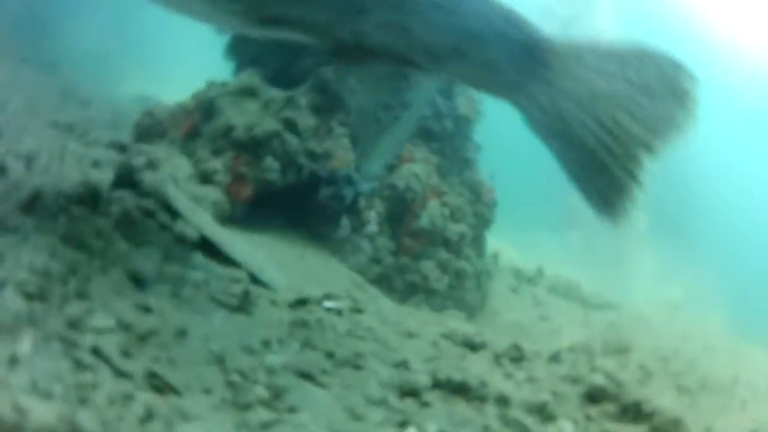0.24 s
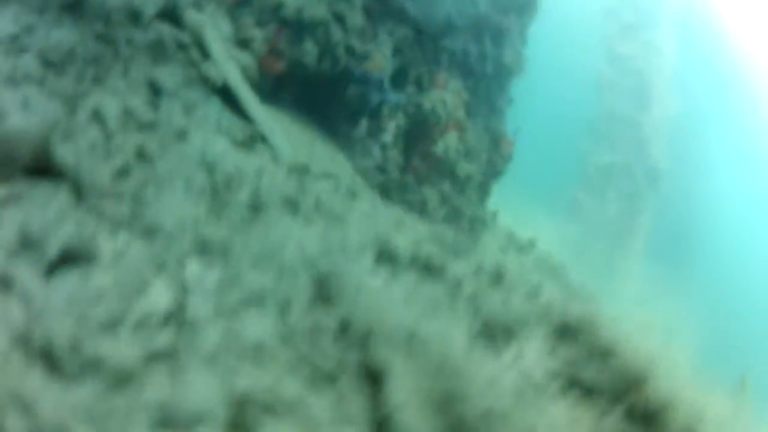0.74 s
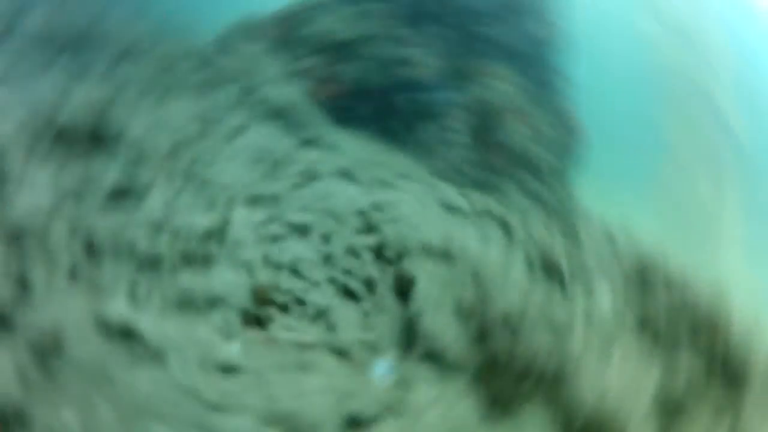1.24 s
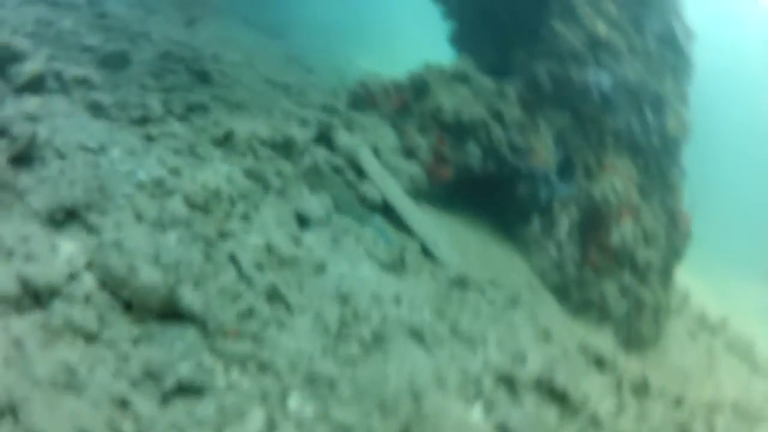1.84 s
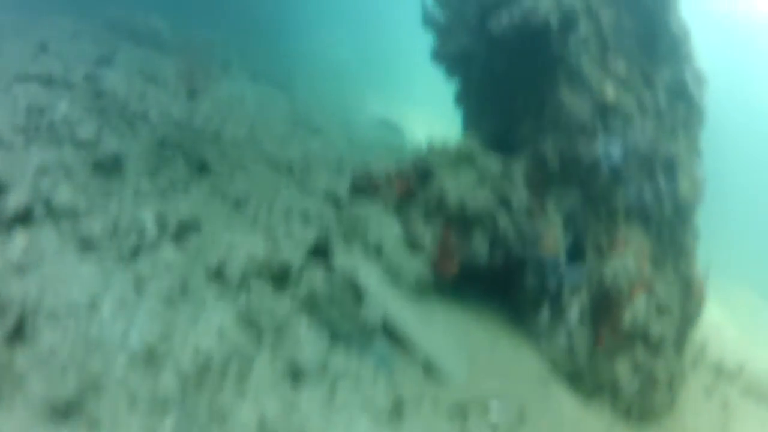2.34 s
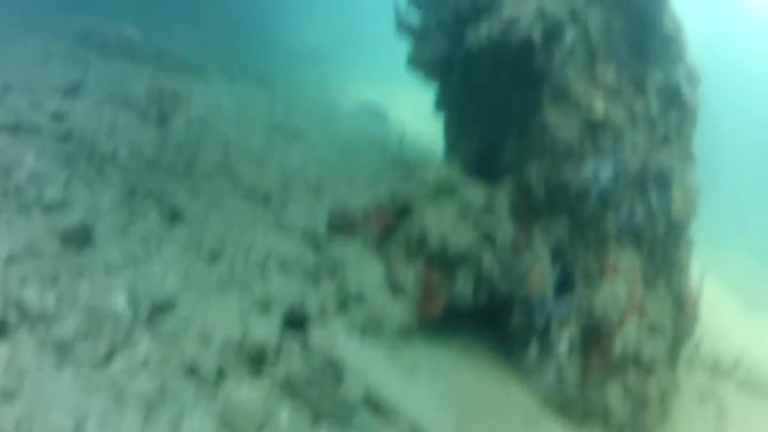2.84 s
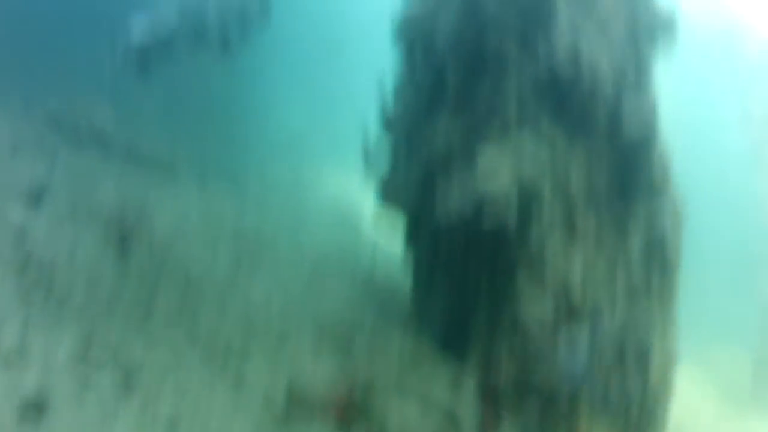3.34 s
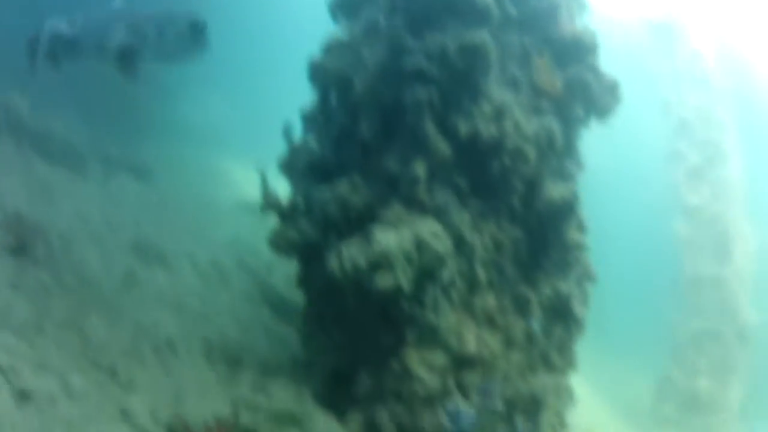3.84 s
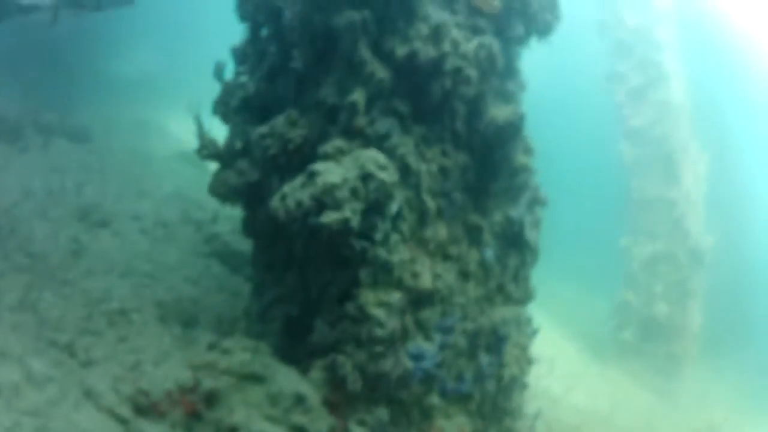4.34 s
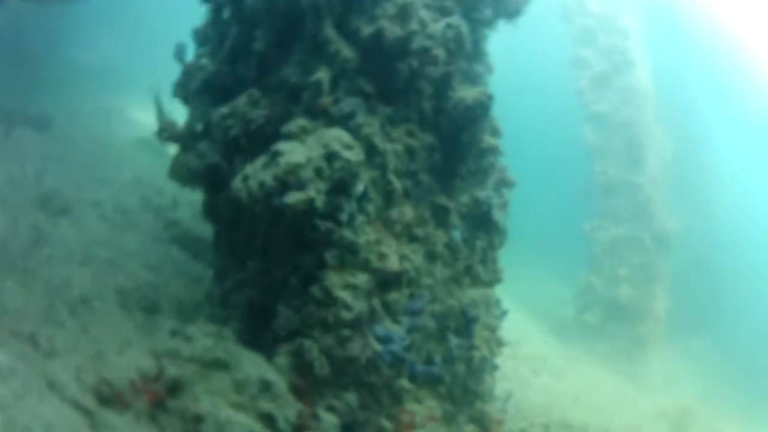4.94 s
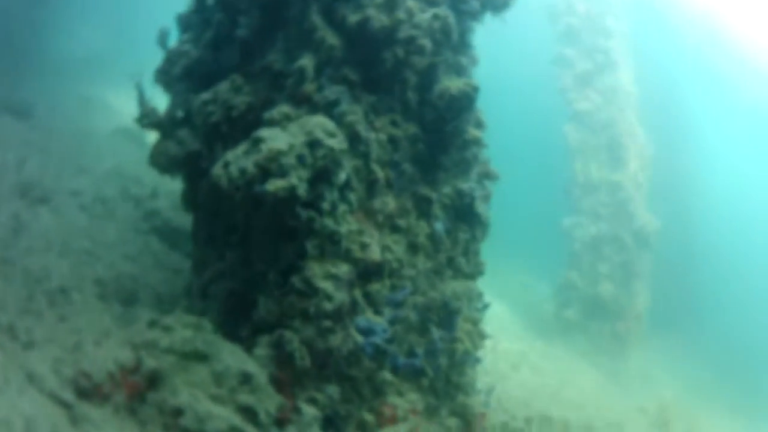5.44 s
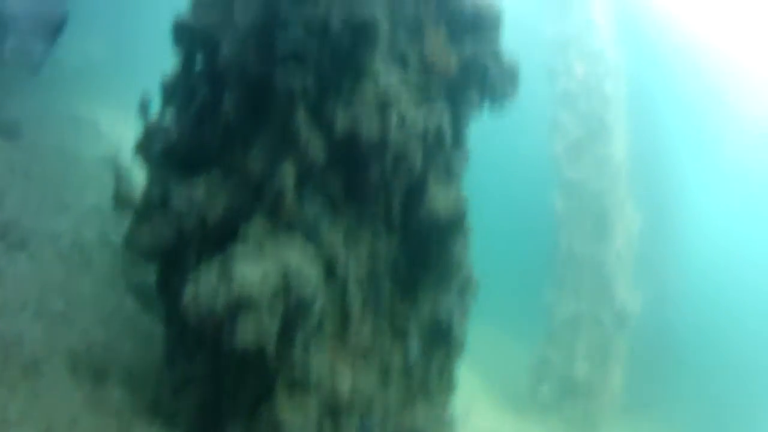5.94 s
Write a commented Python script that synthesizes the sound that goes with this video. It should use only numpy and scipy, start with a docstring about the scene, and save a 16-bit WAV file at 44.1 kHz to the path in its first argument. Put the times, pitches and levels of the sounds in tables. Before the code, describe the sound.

Harbor water near pilings, heard boxed-in and gritty by a microphone sealed in a housing. Distant shrimp make a constant frying fizz of tiny clicks, with individual snaps closer by. Early on, a short cluster of violent bumps on the case thuds, rasps and squeaks, clipping harshly. Afterward only crackle and faint low wash remain, ending with several brighter, louder pops.

```python
"""Snapping shrimp crackle near and far under a harbour pier, heard inside a sealed camera housing.
Each snap is a spike with a scattered tail, coloured by the resonant wall; the far bed adds a noise fizz.
A faint rumble and drone lie below. Around one second bumps rasp the wall, thud the sealed air and make the
mount squeak by stick-slip. Loud knocks duck the gain and overload the recorder, which samples slowly and
holds each value, mirroring the sound into a gritty treble."""
import sys
import numpy as np
from scipy import signal
from scipy.fft import rfft, irfft
from scipy.io import wavfile
from scipy.ndimage import uniform_filter1d, minimum_filter1d

SR = 44100
rng = np.random.default_rng(int(sys.argv[2]) if len(sys.argv) > 2 else 0)


def to_wav(sig):
    """Store sig (one row per channel, or 1-D mono) as 16-bit WAV at the path in sys.argv[1].

    Samples outside -1..1 are clipped; the rate is SR.
    """
    pcm = np.clip(np.atleast_2d(sig), -1, 1) * 32767
    pcm = np.round(pcm).astype(np.int16)
    wavfile.write(sys.argv[1], SR, pcm.T)  # frames by channels


N = 273420  # samples in the scene

SPAN = 8192  # samples in one impulse response or event
AGE = np.arange(SPAN) / SR  # seconds since the event began
HZ = np.fft.rfftfreq(SPAN, 1 / SR)


def from_db(db):
    """Logarithmic level: 20 dB is a factor of ten in amplitude."""
    return 10 ** (np.asarray(db) / 20)


def rms_one(x):
    """Mean power: scale to rms 1."""
    return x / np.sqrt(np.mean(x ** 2) + 1e-20)


def burst_one(x, size=220):
    """Short-time power: scale so that the loudest 5 ms have rms 1."""
    power = uniform_filter1d(x ** 2, size, mode="constant")
    return x / np.sqrt(power.max() + 1e-20)


def colour(points):
    """Spectral envelope: gain interpolated over log frequency from (hz, gain_db) points."""
    hz, db = np.transpose(points)
    return from_db(np.interp(np.log(HZ + 1), np.log(hz), db))


def bell(hz, width):
    """Resonance: a steep-sided curve with top 1, about a third as high one width from the centre."""
    return (1 + ((HZ - hz) / width) ** 2) ** -1.5


def resonances(modes):
    """Modal superposition: the powers of (hz, width_hz, gain_db) resonances add."""
    power = sum((from_db(db) * bell(hz, width)) ** 2 for hz, width, db in modes)
    return np.sqrt(power)


def response(gain):
    """Minimum phase: folding the cepstrum gives a causal impulse response with this gain."""
    cepstrum = irfft(np.log(gain + 1e-6))
    cepstrum[1:SPAN // 2] *= 2
    cepstrum[SPAN // 2 + 1:] = 0
    return irfft(np.exp(rfft(cepstrum)))


def through(x, impulse):
    """Linear filtering: convolve with an impulse response, keeping the length."""
    return signal.fftconvolve(x, impulse)[:len(x)]


def add(out, s, sound):
    """Superposition: mix a sound in at a time in seconds."""
    at = max(round(s * SR), 0)
    out[at:at + len(sound)] += sound[:max(len(out) - at, 0)]


# resonances of the housing wall: (pitch_hz [Hz], width_hz [Hz], relative gain_db [dB])
WALL_MODES = [(557, 390, -24), (701, 70, -16.5), (885, 52, -11.5), (980.4, 64, -12), (1520, 280, -6.5),
              (2089, 370, 0.5), (2377, 240, 0.5), (3005, 230, -9.5), (3560, 470, -5.5), (4330, 630, -17),
              (5062, 590, -15), (5470, 540, -17.5)]
# dips in the passed sound: (pitch_hz [Hz], width_hz [Hz], gain_db [dB]); gaps the wall hardly passes, and a #
# separate shallow dip at 6 kHz
WALL_GAPS = [(1232, 180, -11.5), (2605, 73, -15), (6000, 300, -1)]


def wall():
    """Modal transmission: the wall passes sound best at its resonances and poorly in its gaps."""
    gaps_db = sum(db * bell(hz, width) for hz, width, db in WALL_GAPS)
    return resonances(WALL_MODES) * from_db(gaps_db)


def snap(gain, tilt_db, boosted_hz, extra_tail_db, boost_db=6.5, boost_width_hz=350,
         scatter_db=-19, scatter_t60=0.028, tail_db=-35, tail_t60=0.15):
    """Cavitation: a collapsing bubble spikes, scatters off piling and seabed, and leaves a faint tail."""
    scatter = from_db(scatter_db - 60 * AGE / scatter_t60)
    tail = from_db(tail_db + extra_tail_db - 60 * AGE / tail_t60)
    arrivals = (scatter + tail) * rng.standard_normal(SPAN)
    arrivals[0] += rng.choice([-1, 1])  # the direct spike
    tilt = tilt_db * np.log2(np.clip(HZ, 600, 6000) / 2200)  # small claws snap brighter
    boost = boost_db * bell(boosted_hz, boost_width_hz)  # each snap has its own colour
    return burst_one(through(arrivals, response(gain * from_db(tilt + boost))))


# course of the far shrimp bed, before its trim and mix: (time_s [s], level_db [dB])
BED_COURSE = [(0.0, -52.5), (0.38, -54), (0.78, -53.5), (0.92, -54.5), (1.0, -51), (1.66, -54.5),
              (2.55, -54.5), (2.69, -56.5), (3.38, -54.5), (4.52, -54), (4.8, -56.5), (5.33, -53.5),
              (5.51, -55), (5.8, -52), (6.2, -51.5)]
BED_TRIM_DB = -0.5


def far_shrimp(per_s=150, spread_db=5.0, variety_db=4.5, extra_tail_db=2.5, fizz_db=-3.5, count=24):
    """Random arrivals: many colonies snap, each with its own colour; the furthest merge into a fizz."""
    gain, crackle = wall(), np.zeros(N)
    tilts = variety_db * np.linspace(-1.5, 1.5, count)  # dB per octave
    boosted = rng.permutation(np.linspace(800, 5400, count))  # Hz
    for tilt_db, boosted_hz in zip(tilts, boosted):
        sizes = from_db(spread_db * np.minimum(rng.exponential(1, N), 2.5))
        snaps = sizes * (rng.random(N) < per_s / count / SR)
        crackle += through(snaps, snap(gain, tilt_db, boosted_hz, extra_tail_db))
    fizz = through(rng.standard_normal(N), response(gain))
    s, db = np.transpose(BED_COURSE)
    level = from_db(BED_TRIM_DB + np.interp(np.arange(N) / SR, s, db))
    return level * (rms_one(crackle) + from_db(fizz_db) * rms_one(fizz))


# spectrum of the low wash of the water: (pitch_hz [Hz], relative gain_db [dB])
WASH_SPECTRUM = [(12, -22.5), (25, -3.5), (100, 0.5), (250, -2.5), (480, -8.5), (750, -14.5), (1000, -8.5),
                 (1300, -19), (3000, -23.5)]
# narrow tones that drone in the housing: (pitch_hz [Hz], width_hz [Hz], relative gain_db [dB])
DRONE_MODES = [(735, 22, -3.5), (975, 18, 0.5)]
WASH_DB, DRONE_DB = -61, -75.5  # rms level of each


def wash():
    """Filtered noise: a faint steady harbour rumble, with narrow resonances droning thinly above it."""
    rumble = rms_one(through(rng.standard_normal(N), response(colour(WASH_SPECTRUM))))
    drone = rms_one(through(rng.standard_normal(N), response(resonances(DRONE_MODES))))
    return from_db(WASH_DB) * rumble + from_db(DRONE_DB) * drone


# nearest snaps: (start_s [s], level_db of the loudest 5 ms [dB], tilt_db [dB per octave],
# pitch_hz around which the snap's colour is boosted [Hz])
NEAREST_SNAPS = [(0.012, -38, -3, 2470), (0.066, -29, 2, 1400), (0.087, -34.5, 1, 5510),
                 (0.127, -38.5, -1.5, 3770), (0.1955, -30.5, -3.5, 2270), (0.6042, -44.5, -5, 3780),
                 (0.695, -42, -5, 4500), (1.3555, -39.5, 1, 5400), (1.5265, -36.5, 0, 2370),
                 (1.5707, -34, 2.5, 1700), (1.6137, -39, -4.5, 3000), (1.6731, -40, -3, 950),
                 (1.7496, -38.5, -2, 3300), (1.8522, -42.5, 4.5, 1797), (1.9314, -34.5, 5, 3470),
                 (1.971, -29, -2, 3020), (2.0525, -39, 1, 3550), (2.2477, -35.5, 3, 2230),
                 (2.408, -36, 9, 800), (2.4233, -39.5, 0, 1695), (2.4664, -40.5, 1.5, 2013),
                 (2.604, -33, 7, 802), (2.6175, -39.5, 0, 4060), (2.6455, -39.5, -3, 4920),
                 (2.8586, -35, 3.5, 797), (2.8956, -39.5, -4.5, 5140), (2.9993, -38.5, 9.5, 950),
                 (3.2703, -38.5, -1.5, 2560), (3.329, -43, -0.5, 804), (3.3426, -41, 6, 1910),
                 (3.454, -33.5, 0.5, 1830), (3.4831, -31.5, 4.5, 3600), (3.652, -42.5, 7, 1620),
                 (3.7818, -42.5, 1, 4960), (3.992, -38.5, 2.5, 3130), (4.0097, -38, 9.5, 800),
                 (4.0706, -39.5, -1.5, 1910), (4.5726, -38.5, -0.5, 4840), (4.6089, -37.5, -0.5, 5170),
                 (4.6385, -36, 0, 4700), (4.9831, -28.5, 2, 1836), (5.0634, -40, -1, 1690),
                 (5.334, -33.5, 0.5, 4200), (5.424, -39, 4, 5170), (5.539, -33, 1, 1900),
                 (5.6157, -19.5, 4.5, 2500), (5.9097, -25, 3, 2120), (5.993, -38, -1.5, 2500),
                 (6.05, -36.5, 2.5, 2510), (6.1189, -24.5, 0.5, 3520), (6.182, -36, 7, 950)]
# shrimp at middle distance snap at random: rate, level and its spread, spread of tilt per octave
MIDDLE_PER_S, MIDDLE_DB, MIDDLE_SPREAD_DB, MIDDLE_TILT_DB = 5, -47, 1.5, 2.5
BOOSTED_LOW_HZ, BOOSTED_HIGH_HZ = 1308, 4940  # where the colour of a random snap may be boosted
# chosen rule: fainter and duller snaps are given a stronger tail:
# level with the usual tail, dB of tail per dB of level, dB of tail per dB/octave of tilt
USUAL_SNAP_DB, TAIL_PER_DB, TAIL_PER_TILT = -33, 0.62, 1.5


def near_shrimp():
    """Direct-to-reverberant ratio: single snaps stand out; fainter, duller ones get a stronger tail."""
    out, gain = np.zeros(N), wall()
    middle = []
    for s in np.flatnonzero(rng.random(N) < MIDDLE_PER_S / SR) / SR:
        db = MIDDLE_DB + MIDDLE_SPREAD_DB * rng.normal()
        tilt_db = MIDDLE_TILT_DB * rng.normal()
        boosted_hz = BOOSTED_LOW_HZ * (BOOSTED_HIGH_HZ / BOOSTED_LOW_HZ) ** rng.random()
        middle.append((s, db, tilt_db, boosted_hz))
    for s, db, tilt_db, boosted_hz in NEAREST_SNAPS + middle:
        extra_tail_db = TAIL_PER_DB * (USUAL_SNAP_DB - db) - TAIL_PER_TILT * tilt_db
        add(out, s, from_db(db) * snap(gain, tilt_db, boosted_hz, extra_tail_db))
    return out


# knocks on the housing, from faint ticks to hard bumps: (start_s [s], contact length_s [s],
# shell rasp level_db [dB], mount squeak level_db [dB], slip rate [per s], thud level_db [dB], thud delay_s [s])
HOUSING_KNOCKS = [(0.748, .001, -38.5, -41.5, 1300, -39, .0002),
                  (0.7806, 0.000505, -13.5, -26.5, 690, -31, 0.0072),
                  (0.787, 0.0032, -16, -18.5, 1740, -38.5, .001),
                  (0.8066, 0.0053, -1.5, -0.5, 1460, 10.5, 0.0033),
                  (0.9492, .0055, -15, -10.5, 1550, 0, .0037), (0.9871, .0035, -4.5, 1, 1010, -10, .0003),
                  (1.1050, .0036, -9, 1.5, 990, -8.5, 0.00026),
                  (1.1998, 0.0033, -7.5, -1, 2100, -11.5, 0.002),
                  (1.2245, 0.0018, -26.5, -25.5, 1200, -18, 0.0015)]
GRAZE_LEAD, GRAZE_DB = 0.9, -15.5  # a graze before each knock: lead in contact lengths, level against it
SHOVE_S, SHOVE_SHARE = .0031, 0.85  # longest shove of the air, or share of a shorter contact
# the wall drags along after a knock: (start_s [s], length_s [s], rasp level_db [dB])
WALL_SCRAPES = [(0.758, .009, -39), (0.792, 0.012, -19), (0.958, .023, -20.5)]
SCRAPE_SQUEAK_DB, SCRAPE_THUD_DB, SCRAPE_SLIPS_PER_S = -36, -47.5, 1100
# the mount creaks under the strain: (start_s [s], length_s [s], squeak level_db [dB], slip rate [per s])
MOUNT_CREAKS = [(0.7552, 0.0059, -33, 1020), (1.023, 0.0035, -26.5, 930), (1.028, 0.013, -30.5, 790),
                (1.049, .012, -30.5, 920), (1.0704, 0.0098, -24.5, 1000), (1.107, 0.0085, -16, 780),
                (1.1198, 0.0072, -11.5, 1000)]
CREAK_RASP_DB, CREAK_THUD_DB = -37.5, -37


def contacts():
    """Contact mechanics: every touch as (s, length, rasp dB, squeak dB, slips per s, thud dB, delay, shove)."""
    for s, length, rasp_db, squeak_db, slips_per_s, thud_db, delay in HOUSING_KNOCKS:
        shove = min(SHOVE_S, SHOVE_SHARE * length)
        yield (s - GRAZE_LEAD * length, length, rasp_db + GRAZE_DB, squeak_db + GRAZE_DB, slips_per_s,
               thud_db + GRAZE_DB, delay, length)
        yield s, length, rasp_db, squeak_db, slips_per_s, thud_db, delay, shove
    for s, length, rasp_db in WALL_SCRAPES:
        yield s, length, rasp_db, SCRAPE_SQUEAK_DB, SCRAPE_SLIPS_PER_S, SCRAPE_THUD_DB, 0, length
    for s, length, squeak_db, slips_per_s in MOUNT_CREAKS:
        yield s, length, CREAK_RASP_DB, squeak_db, slips_per_s, CREAK_THUD_DB, 0, length


# resonances of the mount: (pitch_hz [Hz], width_hz [Hz], relative gain_db [dB])
MOUNT_MODES = [(467, 80, -11.5), (864, 99, -8.5), (900, 45, -9), (1020.4, 210, -4.5), (1370.4, 140, -10.5),
               (2150, 600, -9), (2980, 300, -16)]
# extra colour of a direct touch on the wall: (pitch_hz [Hz], gain_db [dB])
TOUCH_COLOUR = [(100, 12.5), (450, 8), (750, 12), (1000, 1), (1800, 6), (2400, -3.5), (3500, 4),
                (6000, 1.5)]
# faint lasting rings of the frame: (pitch_hz [Hz], level_db against the thud [dB], t60_s [s])
FRAME_RINGS = [(1190, -52, 0.21), (867.4, -43, 0.092)]


def knocks(release_s=.0007, strike=6.0, build=0.69, grit=.22, waver=0.088, waver_hz=120,
           thud_hz=112, thud_width_hz=270, leak_hz=35):
    """Stick-slip and cavity resonance: a contact rasps the shell, squeaks the mount and shoves the sealed air."""
    out = np.zeros(N)
    shell = response(wall() * colour(TOUCH_COLOUR))
    mount = response(resonances(MOUNT_MODES))
    r = np.exp(-np.pi * thud_width_hz / SR)
    cavity = [1, -2 * r * np.cos(2 * np.pi * thud_hz / SR), r * r]  # two-pole resonance
    leak = signal.butter(1, leak_hz, "high", fs=SR)  # the microphone ignores slow pressure
    frame = sum(from_db(db - 60 * AGE / t60) * np.sin(2 * np.pi * hz * AGE) for hz, db, t60 in FRAME_RINGS)
    for s, length, rasp_db, squeak_db, slips_per_s, thud_db, delay, shove in contacts():
        pressed = np.exp(-np.maximum(AGE - length, 0) / release_s)
        shell_friction, mount_friction = pressed * rng.standard_normal((2, SPAN))
        shell_friction[0] = strike  # first touch
        rasp = burst_one(through(shell_friction, shell))

        swell = pressed * np.minimum(AGE / (build * length), 1)  # the squeak builds up during the contact
        grip = waver * np.sin(2 * np.pi * (waver_hz * AGE + rng.random()))  # unsteady
        pace = slips_per_s * (1 + grip)
        slips = swell * (np.cumsum(pace) / SR % 1 - .5)  # force grows while stuck, drops at each slip
        squeak = burst_one(through(slips + grit * mount_friction, mount))

        push = signal.lfilter(*leak, np.sin(np.pi * np.minimum(AGE / shove, 1)))
        thud = burst_one(signal.lfilter([-1, 1], cavity, push))

        add(out, s, from_db(rasp_db) * rasp)
        add(out, s, from_db(squeak_db) * squeak)
        add(out, s + delay, from_db(thud_db) * (thud + frame))
    return out


def scene():
    """Superposition: one microphone inside the housing feeds both channels."""
    return np.tile(far_shrimp() + wash() + near_shrimp() + knocks(), (2, 1))


def gain_control(x, threshold_db=-6, share=0.75, deepest_db=9.0, hold_s=0.065, release_db_per_s=550,
                 attack_s=0.0014):
    """Compression: loud peaks pull the gain down within milliseconds; it holds a moment, then climbs back."""
    level_db = 20 * np.log10(np.abs(x) + 1e-9)
    over = np.clip(share * (level_db - threshold_db), 0, deepest_db)
    half = int(hold_s * SR / 2)
    held = -minimum_filter1d(-over, 2 * half + 1, origin=half)  # largest cut within the hold time
    climb = release_db_per_s * np.arange(N) / SR
    cut_db = np.maximum.accumulate(held + climb) - climb  # the cut eases at a fixed rate
    r = np.exp(-1 / (attack_s * SR))
    smooth_cut_db = signal.lfilter([1 - r], [1, -r], cut_db)
    return x * from_db(-smooth_cut_db)


def record(dry, sample_hz=12000, overload=.94, cutoff_hz=15400):
    """Sample-and-hold imaging: slow, clipped samples held in steps mirror the sound around 12 kHz."""
    slow = signal.resample_poly(gain_control(dry[0]), sample_hz, SR)
    clipped = np.clip(slow, -overload, overload)
    steps = np.repeat(clipped, 4)
    held = signal.resample_poly(steps, SR, 4 * sample_hz)[:N]
    top_cut = signal.firwin(127, cutoff_hz, fs=SR)
    return np.tile(np.convolve(held, top_cut, "same"), (2, 1))


dry = scene()
out = record(dry)
to_wav(out)
```